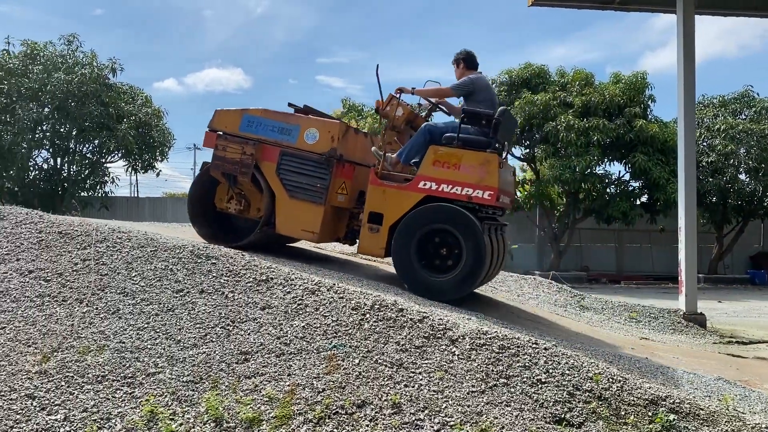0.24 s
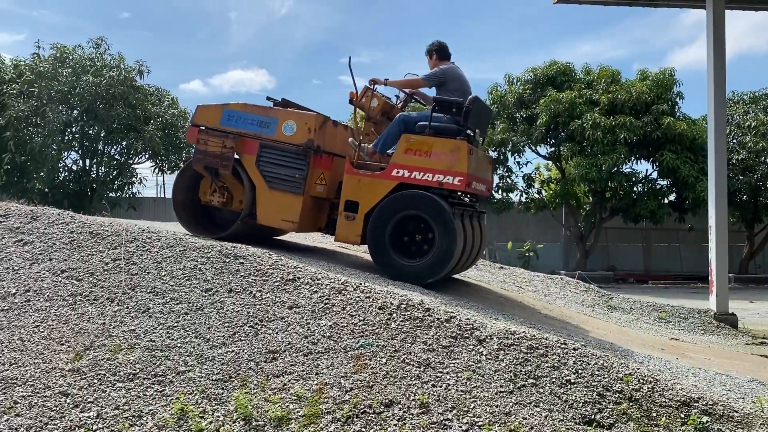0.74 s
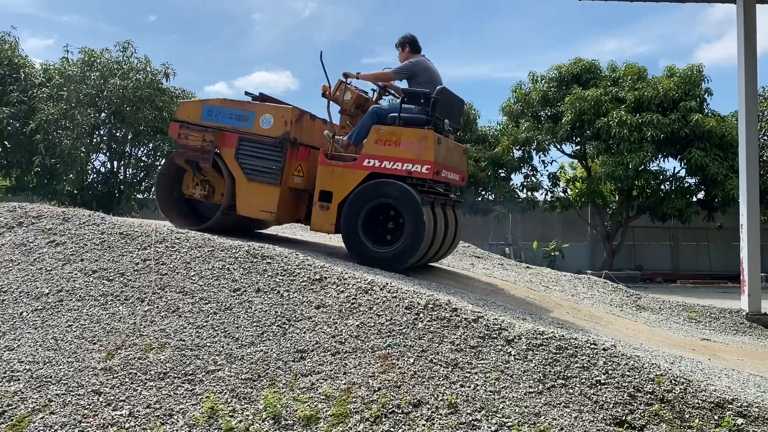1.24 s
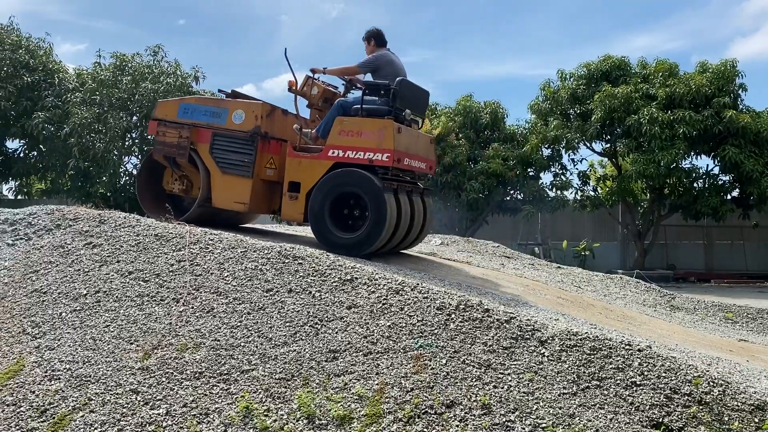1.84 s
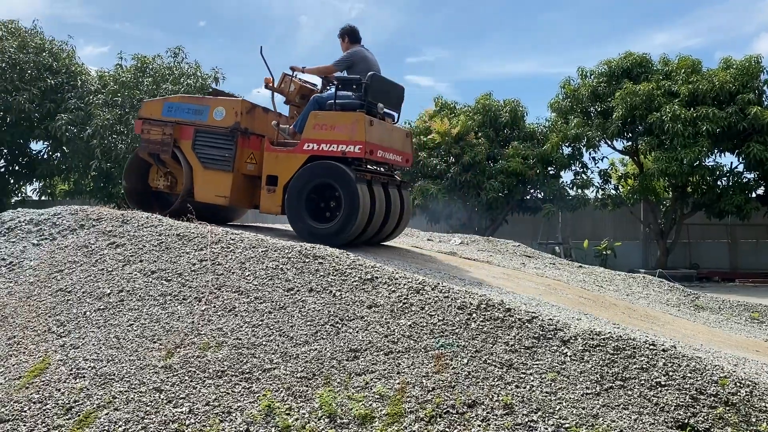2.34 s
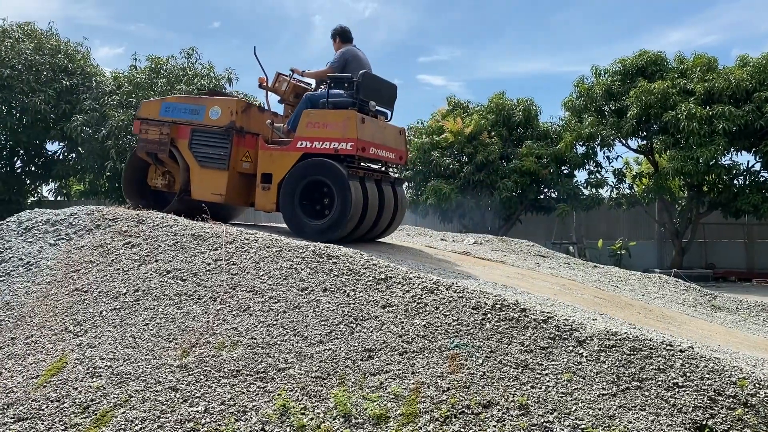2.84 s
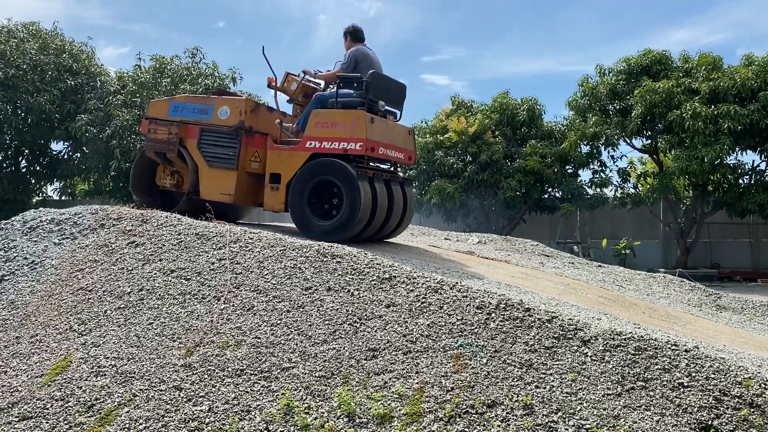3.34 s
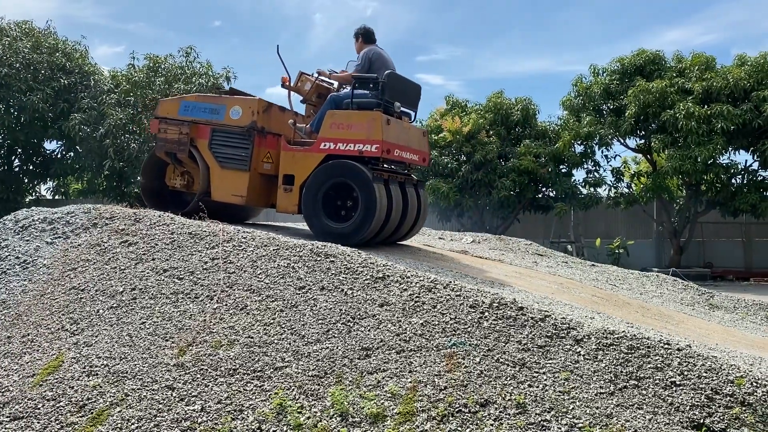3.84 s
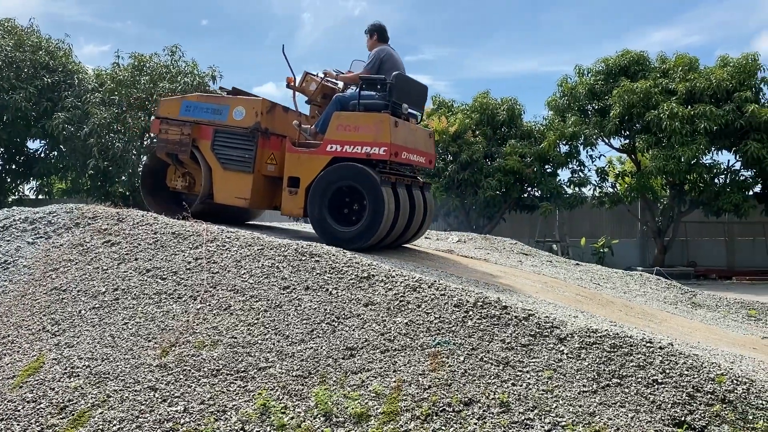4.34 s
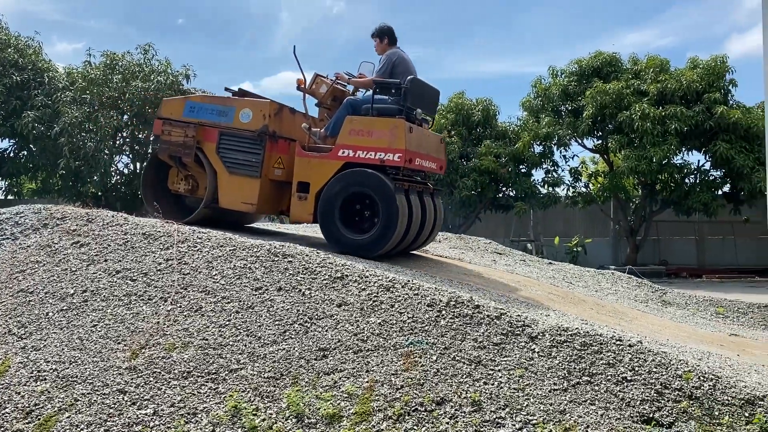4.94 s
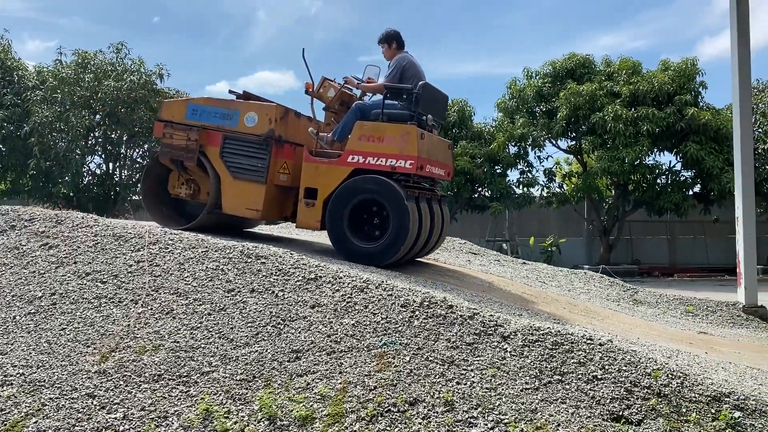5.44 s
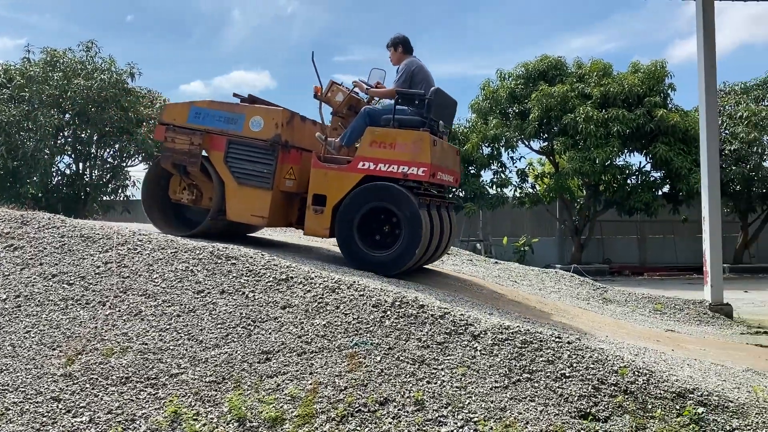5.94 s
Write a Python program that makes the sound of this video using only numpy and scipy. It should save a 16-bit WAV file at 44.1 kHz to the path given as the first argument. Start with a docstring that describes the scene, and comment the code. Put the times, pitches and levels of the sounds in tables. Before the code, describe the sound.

Heavy diesel compactor on a gravel heap: slow throbbing exhaust and squeaky steel scraping, then a faster, deeper-humming engine with stones snapping under the drum.

```python
"""Diesel roller on a gravel pile

Two microphones in the open, a few metres away: the engine labours slowly, then speeds up after two seconds.
Gravel is shaped noise and decaying rings under the steel drum, whose rim scrapes and sings at first.
The exhaust is a stack of shaft orders over a rough boom; block, clatter and injectors are pulsed noise.
A drive drone and a thin gear whine, made of sines, come up with the speed; casing and side panel ring."""
import sys
import numpy as np
from scipy import signal
from scipy.fft import rfft, irfft, next_fast_len
from scipy.io import wavfile
from scipy.ndimage import uniform_filter1d, map_coordinates

SR = 44100
rng = np.random.default_rng(int(sys.argv[2]) if len(sys.argv) > 2 else 0)


def to_wav(s):
    """Save 16-bit WAV."""
    ch = np.atleast_2d(s).T  # columns
    pcm = np.round(np.clip(ch, -1, 1) * 32767)  # PCM
    wavfile.write(sys.argv[1], SR, pcm.astype(np.int16))


N = 273640

# All levels are relative: the layers' gains add to them.
# Grinding of the drum on the gravel. Each row: time in seconds, strength in dB.
GRIND = [(0.0, -29), (1.19, -41.5), (1.42, -42.5), (2.23, -40.5), (3.02, -45), (4.87, -37), (5.2, -38),
         (5.72, -35), (6.2, -38.5)]
USUAL_GRIND_DB = -38
GRINDING_DB, GRINDING_GROWS = -38, 1  # level at the usual grind, dB per dB of grind
CRACKLE_DB, CRACKLE_GROWS, CRACKLE_FAST_DB = -44, 0.69, 1  # the last is added at full pace
# Noise colour of the ground gravel. Each row: frequency in Hz, level in dB per Hz.
GRAVEL_COLOUR = [(2000, -5.5), (4000, -3), (4700, 1.5), (5800, -3.5), (6750, 1.5), (7500, 2.5), (8300, -1),
                 (10000, -45), (16000, -30)]
# Noise colour of the crackle. Each row: frequency in Hz, level in dB per Hz.
CRACKLE_COLOUR = [(4000, -26), (8000, -15.5), (9500, 6.5), (11000, 6), (12200, 2.5), (14000, -4.5),
                  (16000, -12)]
# Resonances of the drum under grit. Each row: frequency in Hz, width in Hz, level in dB.
DRUM_MODES = [(10300, 120, -3), (10800, 60, -8), (11790, 60, 1), (14500, 200, -11)]
# Stones that crack under the drum. Each row: time in seconds, level in dB, loudest drum mode in Hz.
CRACKED_STONES = [(0.0548, -22, 11600), (0.4025, -25, 10700), (0.7751, -25, 10300), (1.8153, -25.5, 10800),
                  (1.946, -17.5, 10900), (2.1645, -25, 10900), (2.2164, -23.5, 10900), (2.2672, -26, 11800),
                  (2.3286, -33, 11800), (2.4563, -20.5, 10900), (2.5935, -22, 10900), (2.6424, -25, 10800),
                  (2.8449, -24, 10900), (2.9297, -24, 10900), (3.0111, -28, 10900), (3.1203, -26, 10900),
                  (3.2575, -25, 10900), (3.4042, -28, 10900), (3.4376, -26, 10900), (3.478, -25, 10900),
                  (3.5738, -25, 10900), (3.8137, -18, 10900), (4.1599, -21.5, 10900), (4.2288, -23, 10900),
                  (4.2956, -23, 11800), (4.3146, -17, 10900), (4.3414, -27, 10900), (4.4588, -27, 10900),
                  (4.7441, -17.5, 11800), (4.7825, -23, 11800), (4.8968, -19, 11800), (4.9427, -27, 12300),
                  (5.2325, -31, 14600), (5.3073, -28, 11200), (5.4176, -26, 11000), (5.5413, -20, 11800),
                  (5.6615, -26, 11800), (5.7039, -21, 11600), (6.0571, -17, 10400)]
# Modes of stone on steel. Each row: frequency in Hz, level in dB, time to fall 60 dB in seconds.
STONE_MODES = [(6880, -12, .04), (10400, -5, .04), (10880, 0, .09), (11790, 0, .07), (14620, -4, .04)]
FAVOUR_DB, FAVOUR_WIDTH_HZ = 5, 270  # modes away from a stone's own pitch ring this much softer
# Crackle around a cracking stone, set against the stone's level, and the lower crunch set against that.
CRUMBLE_DB, CRUMBLE_RISE_S, CRUMBLE_S, CRUSH_DB = -22, 0.0081, 0.06, -3.5
# Larger chips that knock together. Each row: time in seconds, level in dB, pitch in Hz.
CHIP_KNOCKS = [(0.2308, -24, 6830), (0.3261, -32, 6780), (0.4737, -26, 6950), (0.5231, -17, 6560),
               (0.625, -18, 6800), (0.6822, -25, 6630), (0.7446, -23, 6540), (0.8409, -22, 6720),
               (0.8688, -19, 6700), (0.996, -29, 6670), (1.1232, -21, 6600), (1.1512, -18.5, 6700),
               (1.4001, -38, 6800), (1.9758, -27, 6580), (2.0511, -27, 6710), (2.8827, -25, 6800),
               (4.2676, -28, 6800), (4.334, -18, 6970), (5.623, -25, 6960), (5.7093, -23, 6850),
               (5.7517, -21, 7000), (5.8046, -18, 6900), (5.9902, -16.5, 6900)]

# Modes of the scraped drum rim. Each row: frequency in Hz, level in dB, group (0 low, 1 middle, 2 high).
RIM_MODES = [(2772, -5, 0), (3310, -8, 0), (3445, -5, 0), (3725, -7, 0), (4280, 1, 0), (4560, -5, 0),
             (4877, 0, 0), (5511, 0, 1), (6165, 0, 2), (6336, -10, 2), (6702, -8, 2), (6835, -4, 2),
             (7538, -3, 2)]
# Grit rubbing the rim. Each row: start in seconds, length in seconds, dB of low, middle and high groups.
RIM_RUBS = [(0.014, 0.14, -44, -50, -45), (0.155, 0.17, -48, -38, -40), (0.36, .06, -53, -35, -37),
            (0.43, .04, -54, -39, -52), (0.52, 0.05, -48, -41, -41), (0.66, .04, -51, -52, -46),
            (0.735, 0.07, -44, -50, -42), (0.87, .03, -46, -50, -44), (0.935, .04, -43, -47, -39),
            (1.145, 0.08, -42, -49, -44), (1.26, 0.07, -46, -52, -46)]
# The rim singing on softly between rubs. Each row: start in seconds, length in seconds, level in dB.
RIM_DRAG = [(0, 0.67, -50), (0.7, 0.65, -53.5)]
RUB_ATTACK_S, RUB_RELEASE_S, DRAG_RELEASE_S = 0.0094, 0.011, 0.11

# Resonances of a loose side panel. Each row: frequency in Hz, width in Hz, level in dB.
PANEL_MODES = [(1273, 9.8, 2.5), (1311, 20, 0.5), (1388, 8, 5.5), (1518, 25, -1.5), (2064, 15, -13),
               (2450, 30, -6.5)]
# Surges of its rattle. Each row: start in seconds, length in seconds, level in dB.
PANEL_SURGES = [(.65, 0.25, -40), (.92, 0.1, -33.5), (1.88, 0.29, -31.5), (3.55, 0.17, -31.5),
                (3.8, 0.8, -33.5), (4.75, 1.7, -38)]
SURGE_ATTACK_S, SURGE_RELEASE_S, PANEL_REST_DB = 0.043, 0.072, -39
# Resonances of the engine casing. Each row: frequency in Hz, width in Hz, level in dB.
CASING_MODES = [(564, 12, 4), (691.4, 14, 10), (875, 13, -4.5), (1261, 31, -3), (1930, 14, -7.5),
                (2093, 14, -0.5), (2244, 11, -3), (2910, 11, -6.5)]
CASING_DB = -35

# Swelling of the gear whine. Each row: time in seconds, level in dB.
WHINE_LEVEL = [(2, -57), (2.3, -52.5), (2.6, -53), (3.05, -55), (3.3, -51.5), (3.65, -51), (3.95, -47.5),
               (4.7, -46.5), (5.25, -49), (5.7, -54), (6.2, -57)]
# Pitch of the drive drone. Each row: time in seconds, frequency in Hz.
DRONE_HZ = [(0, 62.55), (1.8, 60.46), (2.1, 63.32), (2.3, 70.75), (2.6, 79.03), (2.9, 80.01), (3.55, 78.68),
            (3.9, 79.63), (4.5, 79.48), (5, 80.12), (5.5, 80.55), (6.2, 79.79)]
# Make-up of the drone. Each row: harmonic number, level in dB.
DRONE_HARMONICS = [(1, 1.2), (2, -8.8), (3, -16.5)]
# The drone grows as it rises. Each row: drone frequency in Hz, level in dB.
DRONE_GROWTH = [(60, -38), (65, -21), (77, -18.5), (80.5, -14.5)]
# Extra level of the drone's third harmonic. Each row: time in seconds, level in dB.
THIRD_LEVEL = [(2.6, 0), (4.3, 0), (4.5, 5), (4.8, 3), (5.0, -1), (6.2, 0.5)]

# Engine speed. Each row: time in seconds, crankshaft turns per second.
SHAFT_SPEED = [(0, 20.65), (0.3, 20.72), (0.7, 20.24), (1, 20.2), (1.3, 19.69), (1.7, 19.62), (2.05, 20.63),
               (2.6, 24.31), (2.9, 24.61), (3.65, 24.72), (3.95, 25.69), (4.65, 25.65), (5.1, 26.01),
               (6.2, 26.03)]
# How hard the engine works. Each row: time in seconds, effort in dB.
EFFORT = [(0.0, -24), (0.38, -27), (1.1, -27.5), (1.47, -32.5), (1.67, -32), (1.97, -29.5), (2.66, -28),
          (2.93, -32), (3.9, -28), (4.82, -24.5), (5.04, -26.5), (6.2, -23.5)]
USUAL_EFFORT_DB = -27.5
# Each layer: level in dB at the usual effort, dB per dB of effort.
EXHAUST_DB, EXHAUST_GROWS = -16.5, 0.36
BLOCK_DB, BLOCK_GROWS = -30, 0.7
CLATTER_DB, CLATTER_GROWS = -32.5, 0.82
LABOUR_DB = 2  # the exhaust is louder while the engine is slow
# The roller starts close by, and its block booms less as it draws away.
NEAR_DB, DRAW_AWAY_S = 5, 0.74
# Strength of the injection ticks over two shaft turns. One value for each tick, in dB.
TICK_PATTERN = [0, -4, -1.5, -6, -1, -4]
# Noise colour of the ticks. Each row: frequency in Hz, level in dB per Hz.
TICK_COLOUR = [(500, -30), (1100, 11), (1400, -3), (2400, -4.5), (3500, -7.5), (6000, -28), (12000, -43)]
TICK_DB = -41
# Noise colour of the booming block. Each row: frequency in Hz, level in dB per Hz.
BLOCK_COLOUR = [(200, -14.5), (300, 5), (380, 4), (440, 2.5), (520, 1.5), (590, 4), (700, -0.5),
                (800, -3.5), (890, -2), (1100, -9), (1800, -70)]
# Noise colour of the clatter. Each row: frequency in Hz, level in dB per Hz.
CLATTER_COLOUR = [(700, -50), (1000, -2), (1130, 1.5), (1380, -1), (1470, -7), (1750, -7), (2100, -4.5),
                  (2450, -7.5), (3000, -10), (3900, -16), (4700, -15), (5900, -19.5), (9000, -27),
                  (16000, -25)]

# Exhaust tones. Each row: shaft order, dB when labouring, dB when running fast.
EXHAUST_ORDERS = [(2, -15, -7), (3, -17, -19), (4, -5, -4), (5, -33, -12), (6, -0.5, -5), (7, -24, -16),
                  (8, -17, -20), (9, -20, -30), (11, -41, -25.5), (12, -13, -16.5)]
# Resonance of the exhaust pipe. Each row: frequency in Hz, level in dB.
PIPE_RESONANCE = [(215, -1), (230, 6), (240, 3), (248, 1.5), (257, 4), (270, 1.5), (290, -3.5)]
# Noise colour of the rough boom under the tones. Each row: frequency in Hz, level in dB per Hz.
BOOM_COLOUR = [(25, -23), (60, -3), (88, -5), (108, 4.5), (122, 5.5), (142, -19), (172, -4), (203, -4),
               (228, -10.5), (280, -16), (400, -27), (700, -76)]
# Level of that boom. Each row: time in seconds, level in dB.
BOOM_LEVEL = [(0, -0.5), (1.2, -7.5), (2.4, -4.5), (3.9, -5), (4.1, -5), (4.6, -3.5), (4.8, -4.5),
              (6.2, -3)]
# Throbs of the firing note. Each row: start in seconds, length in seconds, level in dB.
FIRING_THROBS = [(0, 0.044, -3.5), (0.14, 0.19, -0.5), (.57, 0.2, 1.5), (.87, 0.084, -2), (1.0, 0.19, 2),
                 (1.34, 0.18, 3), (1.67, 0.058, 3), (1.79, 0.083, 0.5), (3.75, 0.32, -1), (4.07, 0.53, 0.5),
                 (4.65, 0.62, -1), (5.3, 0.93, -2.5)]
FIRING_ORDER, THROB_ATTACK_S, THROB_RELEASE_S, LULL_DB = 6, 0.019, 0.025, -8
# The octave of the firing note humming out. Each row: start in seconds, length in seconds, level in dB.
OCTAVE_HUMS = [(.72, 1.35, -2), (4.85, 0.43, 2.5)]
HUM_ATTACK_S, HUM_RELEASE_S, HUM_REST_DB = 0.13, 0.04, -8
# Shaft orders that fall back briefly at full speed.
MIDDLE_ORDERS = (4, 5)
# Their dip. Each row: time in seconds, level in dB.
MIDDLE_DIP = [(4.0, 0), (4.12, -6), (4.55, -7), (4.68, 0)]

# Stereo width of the noises. Each row: frequency in Hz, side minus mid in dB.
STEREO_WIDTH = [(60, -16), (110, -20), (200, -8), (380, -9), (700, -4), (1290, -0.5), (2380, -4.5),
                (4400, -5.5), (8120, 3)]
# Colour difference of the microphones. Each row: frequency in Hz, left minus right in dB.
LEFT_OVER_RIGHT = [(60, -0.5), (110, 0.5), (200, 1), (380, 0.5), (700, 4.5), (1290, 3.5), (2380, 1),
                   (4400, 4), (8120, -2.5), (15000, 1)]
# Going up through the treble the microphones pass in and out of step.
PORT_FROM_HZ, PORT_PERIOD_HZ, PORT_ALIKE = 7000, 4150, 0.65
TOP_HZ = 15900  # nothing is kept from here up


def amp(db):
    """Decibels to gain."""
    return 10 ** (np.asarray(db) / 20)


def unit(x):
    """Scaled to rms 1."""
    return x / np.sqrt(np.mean(x ** 2) + 1e-20)


def along(points, hz):
    """(Hz, value) points read on a log frequency axis."""
    f, v = np.transpose(points)
    return np.interp(np.log(hz + 1), np.log(f + 1), v)


def curves(rows):
    """One value per sample for each column after the time."""
    s, *cols = np.transpose(rows)
    return [np.interp(np.arange(N) / SR, s, c) for c in cols]


def wobble(rate):
    """A smooth random curve, rate knots a second."""
    knots = rng.standard_normal(int(N * rate / SR) + 4)
    return map_coordinates(knots, [np.arange(N) * rate / SR])


def angle(hz):
    """Running phase of a frequency curve."""
    return 2 * np.pi * np.cumsum(hz) / SR


def swells(rows, attack, release):
    """Sum of (start, length, dB) envelopes that rise, hold and die away."""
    t = np.arange(N) / SR
    total = np.zeros(N)
    for s, length, db in rows:
        rise = np.clip((t - s) / attack + 0.5, 0, 1)
        total += amp(db) * rise * np.exp(-np.maximum(t - s - length, 0) / release)
    return total


def pace(speed):
    """0 while the engine labours, 1 when it runs fast."""
    return np.clip((speed - 20.5) / 4.5, 0, 1)


def extra_effort():
    """Engine effort above the usual, in dB."""
    return curves(EFFORT)[0] - USUAL_EFFORT_DB


def noise():
    """Two unrelated white noises."""
    return rng.standard_normal((2, N))


def filtered(x, response):
    """The signal shaped by a response of frequency."""
    m = next_fast_len(N + SR // 2)
    return irfft(rfft(x, m) * response(np.fft.rfftfreq(m, 1 / SR)), m)[..., :N]


def spread(pair, spectrum):
    """Two unrelated signals coloured as mid and side: narrow in the bass, wide in the treble."""
    def colour(hz):
        return amp(along(spectrum, hz)) * amp([0 * hz, along(STEREO_WIDTH, hz)])
    mid, side = filtered(pair, colour)
    return np.array([mid + side, mid - side]) / np.std(mid)


def patches(x, depth_db):
    """The colour drifts: neighbouring bands swell and fade on their own."""
    z = signal.stft(x, nperseg=512)[2]
    field = rng.standard_normal(z.shape[1:])
    field = uniform_filter1d(uniform_filter1d(field, size=5, axis=0), size=24, axis=1)
    return signal.istft(z * amp(depth_db * unit(field)), nperseg=512)[1][:, :N]


def ringing(modes):
    """Random chatter through (Hz, width Hz, dB) resonances: two unrelated signals, rms 1 overall."""
    def response(f):
        return sum(amp(db) * 1j * f * w / (c * c - f * f + 1j * f * w) for c, w, db in modes)
    return unit(filtered(noise(), response))


def slips(rate, life, scatter_db):
    """Power of small stones that slip at random, each suddenly, then dying away; mean 1."""
    sizes = amp(2 * scatter_db * np.clip(rng.standard_normal(N), -2, 2))
    starts = (rng.random(N) < rate / SR) * sizes
    power = signal.lfilter([1], [1, -np.exp(-1 / (life * SR))], starts)
    return power / power.mean()


def crunch(spectrum, power, bed):
    """Noise puffs of slipping stones over a bed of steady grinding."""
    return spread(noise() * np.sqrt(power + bed), spectrum)


def chips(count, hz, detune, t60):
    """Small chips clink against each other: decaying sines, each at its own pitch."""
    out, t = np.zeros((2, N + SR)), np.arange(SR // 16) / SR
    for start, pitch, size, turn in rng.random((count, 4)):
        cycles = hz * (1 + detune * (pitch - 0.5)) * t
        clink = np.sin(2 * np.pi * (cycles + [[0], [turn / 3]]))  # right channel shifted in phase
        out[:, int(start * N):][:, :len(t)] += amp(-12 * size - 60 * t / t60) * clink
    return unit(out[:, :N])


def gravel(speed):
    """The drum grinds the gravel and rings with it; crackle grows with pace and around cracking stones."""
    t = np.arange(N) / SR
    grind_db = curves(GRIND)[0] - USUAL_GRIND_DB
    slipping = slips(rate=85, life=0.009, scatter_db=3.2)
    grinding = crunch(GRAVEL_COLOUR, slipping, bed=0.7)
    grinding = grinding + amp(-7) * chips(count=280, hz=6720, detune=0.068, t60=0.057)
    drum = np.sqrt(slips(rate=75, life=0.019, scatter_db=7)) * ringing(DRUM_MODES)
    crackling = crunch(CRACKLE_COLOUR, slipping, bed=0.57) + amp(-8) * drum
    crumble = np.zeros(N)
    for s, db, _ in CRACKED_STONES:
        away = np.maximum((s - t) / CRUMBLE_RISE_S, (t - s) / CRUMBLE_S)
        crumble += amp(db + CRUMBLE_DB) * np.exp(-away)
    rolling = amp(CRACKLE_DB + CRACKLE_GROWS * grind_db + CRACKLE_FAST_DB * pace(speed))
    crushing = amp(GRINDING_DB + GRINDING_GROWS * grind_db)
    low = np.hypot(crushing, amp(CRUSH_DB) * crumble) * patches(grinding, depth_db=1.4)
    return low + np.hypot(rolling, crumble) * crackling


def clinks(gain_db, attack, t60, detune):
    """Larger chips knock together, each with a close cluster of five modes."""
    out, t = np.zeros((2, N + SR)), np.arange(SR // 10) / SR
    for s, db, hz in CHIP_KNOCKS:
        modes = hz * (1 + detune * rng.standard_normal((5, 1, 1)))
        ring = unit(np.sin(2 * np.pi * (modes * t + rng.random((5, 2, 1)))).sum(axis=0))
        envelope = amp(db + gain_db - 60 * t / t60) * (1 - np.exp(-t / attack))
        out[:, round(s * SR):][:, :len(t)] += envelope * ring
    return out[:, :N]


def pings(rows, crack_db, dust_db, rise):
    """Each stone gives way, rings on the steel, most at one mode, and crumbles in a few splinters."""
    out, t = np.zeros((2, N + SR)), np.arange(SR // 8) / SR
    for s, db, own_hz in rows:
        ring = np.zeros(len(t))
        for hz, level, t60 in STONE_MODES:
            favour_db = FAVOUR_DB * (np.exp(-((hz - own_hz) / FAVOUR_WIDTH_HZ) ** 2) - 1)
            size = amp(level + favour_db + rng.normal(0, 3.2) - 60 * t / t60)
            pitch = hz * rng.normal(1, 0.0023)
            ring += size * np.sin(2 * np.pi * pitch * t + rng.uniform(0, 2 * np.pi))
        splinters = amp(4 * np.interp(t, np.linspace(0, t[-1], 24), rng.standard_normal(24)))
        crack = amp(crack_db - 60 * t / 0.012)
        dust = splinters * amp(dust_db - 60 * t / 0.077)
        snap = (crack + dust) * rng.standard_normal((2, len(t)))
        first = max(round((s - rise) * SR), 0)
        out[:, first:][:, :len(t)] += amp(db) * (1 - np.exp(-t / rise)) * (ring + snap)
    colour = [(500, -32), (3000, -6), (7000, -1), (9000, -8), (10500, -4), (16000, 1)]  # (Hz, dB)
    return filtered(out[:, :N], lambda hz: amp(along(colour, hz)))


def stones(loud_db, small_db, count):
    """The listed loud cracks among many small ones at random times."""
    times = rng.uniform(0, N / SR, count)
    levels_db = small_db + 2 * rng.standard_normal(count)
    small = np.transpose([times, levels_db, rng.uniform(10000, 12500, count)])
    loud = pings(CRACKED_STONES, crack_db=1, dust_db=-3, rise=0.002)
    return amp(loud_db) * loud + pings(small, crack_db=1, dust_db=-6, rise=0.002)


def scrape(flutter_db):
    """Rubs of grit wake three groups of drum rim modes differently; every mode flutters on its own."""
    rubs = []
    for group in range(3):
        rows = [(s, length, dbs[group]) for s, length, *dbs in RIM_RUBS]
        rubs.append(swells(rows, RUB_ATTACK_S, RUB_RELEASE_S))
    drag = swells(RIM_DRAG, RUB_ATTACK_S, DRAG_RELEASE_S)
    song = np.zeros((2, N))
    for hz, db, group in RIM_MODES:
        phase = angle(hz + 17 * wobble(200))
        drive_level = np.hypot(rubs[group], drag * amp(4 * wobble(12.4)))
        size = drive_level * amp(db + flutter_db * np.tanh(wobble(69.7)))
        song += size * np.array([np.sin(phase), np.sin(phase + wobble(11.2))])
    return song


def panel():
    """Random chatter rings the few modes of a sheet-steel panel, in surges."""
    pair = ringing(PANEL_MODES)
    shake = np.hypot(amp(PANEL_REST_DB), swells(PANEL_SURGES, SURGE_ATTACK_S, SURGE_RELEASE_S))
    return shake * unit(pair + 0.059 * pair[::-1])  # a little leaks across the channels


def casing(speed, slow_db):
    """The engine casing rings at a few narrow resonances, mostly at speed."""
    pair = ringing(CASING_MODES)
    return amp(CASING_DB + slow_db * (1 - pace(speed))) * unit(pair + 0.29 * pair[::-1])


def whine(speed, order):
    """Gear teeth mesh at a high multiple of the smoothed shaft speed, with a weaker octave."""
    phase = angle(order * uniform_filter1d(speed, SR // 5) + 5 * wobble(60))
    tone = np.sin(phase) + amp(-9) * np.sin(2 * phase)
    return np.sqrt(2) * amp(curves(WHINE_LEVEL)[0] + 2.5 * wobble(14)) * tone


def drive(speed, gain_db, overtone_db):
    """The drive takes up load and settles on a deep drone; overtones shift in level near full speed."""
    hz, = curves(DRONE_HZ)
    third_db, = curves(THIRD_LEVEL)
    phase = angle(hz)
    flat_out = np.clip(speed - 25, -1, 1)
    tone = np.zeros(N)
    for k, level in DRONE_HARMONICS:
        level_db = level + (k == 3) * third_db + (k > 1) * overtone_db * flat_out
        tone += amp(level_db + 0.15 * (k - 1) * wobble(8.5)) * np.sin(k * phase)
    return np.sqrt(2) * amp(along(DRONE_GROWTH, hz) + gain_db) * tone


def ticks(speed, life):
    """Injectors tick in step with the shaft: sudden noise, quick decay, each cylinder at its own strength."""
    count = angle(speed) / (4 * np.pi) * len(TICK_PATTERN)
    index = count.astype(int)
    age = (count - index) * 2 / (len(TICK_PATTERN) * speed)  # seconds since the last tick
    size_db = np.take(TICK_PATTERN, index, mode="wrap") + rng.normal(0, 2.3, index[-1] + 1)[index]
    bursts = noise() * amp(size_db) * np.exp(-age / life)
    return amp(TICK_DB + CLATTER_GROWS * extra_effort()) * spread(bursts, TICK_COLOUR)


def knocks(shaft, spectrum, depth_db, repeat, patchy_db):
    """Noise pulses twice a shaft turn; a share of the rattle repeats every two turns."""
    cycle = rng.standard_normal((2, 3400))
    place = (shaft / (4 * np.pi) % 1) * cycle.shape[1]
    locked = np.array([map_coordinates(c, [place], mode="grid-wrap") for c in cycle])
    bursts = amp(depth_db * np.cos(2 * shaft))
    rattle = bursts * (np.sqrt(repeat) * locked + np.sqrt(1 - repeat) * noise())
    return spread(patches(rattle, patchy_db), spectrum)


def exhaust(speed, shaft, level_db, boom_db, waver_db):
    """Shaft orders, shaped by the pipe resonance, over a rough boom that puffs twice a shaft turn."""
    fast = pace(speed)
    tones = np.zeros(N)
    for order, slow_db, fast_db in EXHAUST_ORDERS:
        order_db = slow_db + fast * (fast_db - slow_db)
        size = amp(order_db + along(PIPE_RESONANCE, order * speed) + waver_db * wobble(8.3))
        lag = rng.uniform(0, 2 * np.pi) * (order != FIRING_ORDER)  # behind the firing note
        if order == FIRING_ORDER:
            throbs = swells(FIRING_THROBS, THROB_ATTACK_S, THROB_RELEASE_S)
            size = size * np.maximum(throbs, amp(LULL_DB))
        if order == 2 * FIRING_ORDER:
            hums = swells(OCTAVE_HUMS, HUM_ATTACK_S, HUM_RELEASE_S)
            size = size * np.maximum(hums, amp(HUM_REST_DB))
        if order in MIDDLE_ORDERS:
            size = size * amp(curves(MIDDLE_DIP)[0])
        tones += np.sqrt(2) * size * np.sin(order * shaft + 0.28 * wobble(8) - lag)
    boom = spread(noise() * amp(3.6 * np.cos(2 * shaft)), BOOM_COLOUR)
    return amp(level_db) * (tones + amp(boom_db) * boom)


def engine(speed):
    """One effort drives the exhaust, the knocking block and the clatter."""
    shaft = angle(speed)
    effort_db = extra_effort()
    near_db = NEAR_DB * np.exp(-np.arange(N) / SR / DRAW_AWAY_S)
    exhaust_db = EXHAUST_DB + EXHAUST_GROWS * effort_db + LABOUR_DB * (1 - pace(speed))
    pipe = exhaust(speed, shaft, exhaust_db, boom_db=curves(BOOM_LEVEL)[0], waver_db=1.76)
    block = knocks(shaft, BLOCK_COLOUR, depth_db=0.55, repeat=0.33, patchy_db=1.1)
    block = amp(BLOCK_DB + BLOCK_GROWS * effort_db + near_db) * block
    clatter = knocks(shaft, CLATTER_COLOUR, depth_db=0.5, repeat=0.25, patchy_db=1.4)
    return pipe + block + amp(CLATTER_DB + CLATTER_GROWS * effort_db) * clatter


def scene():
    """Gravel, drum rim, drive and engine, heard in the open."""
    speed, = curves(SHAFT_SPEED)
    ground = gravel(speed) + stones(loud_db=-5.5, small_db=-42, count=110)
    ground = ground + clinks(gain_db=-3.5, attack=0.0012, t60=0.071, detune=0.023)
    rim = amp(1.5) * scrape(flutter_db=7)
    body = panel() + casing(speed, slow_db=-9)
    gears = whine(speed, order=216) + drive(speed, gain_db=-0.8, overtone_db=-1)
    return ground + rim + body + gears + ticks(speed, life=0.002) + engine(speed)


def ports(x):
    """Up the treble, sound alternates between middle and sides as the microphones pass in and out of step."""
    mid, side = (x[0] + x[1]) / 2, (x[0] - x[1]) / 2

    def turn(hz):
        return np.pi * np.maximum(hz - PORT_FROM_HZ, 0) / PORT_PERIOD_HZ

    mixed = PORT_ALIKE * mid + np.sqrt(1 - PORT_ALIKE ** 2) * side
    swung = filtered(mixed, lambda hz: -1j * np.sin(turn(hz)))
    low_side = filtered(side, lambda hz: np.clip((PORT_FROM_HZ - hz) / 900, 0, 1))
    mid, side = filtered(mid, lambda hz: np.cos(turn(hz))), low_side + swung
    return np.array([mid + side, mid - side])


def record(dry):
    """The two microphones differ a little in colour and keep nothing above the band limit."""
    def response(hz):
        return amp(np.outer([0.5, -0.5], along(LEFT_OVER_RIGHT, hz))) * (hz < TOP_HZ)
    return filtered(ports(dry), response)


dry = scene()
out = record(dry)
to_wav(out)
```